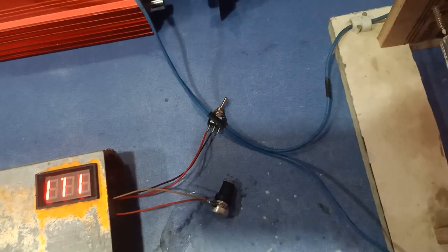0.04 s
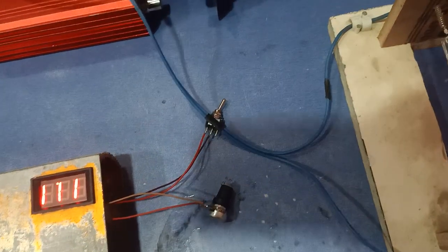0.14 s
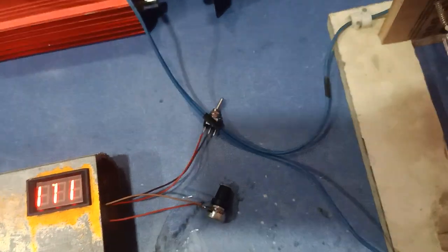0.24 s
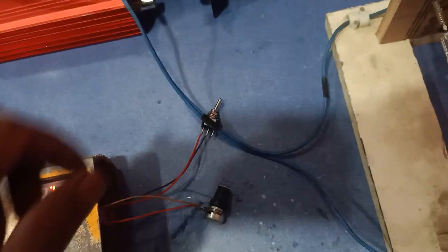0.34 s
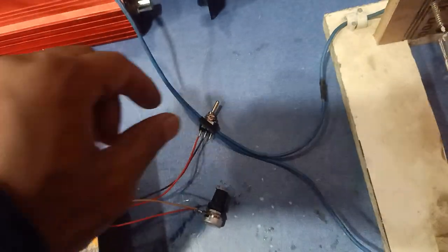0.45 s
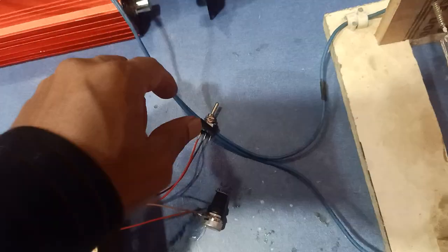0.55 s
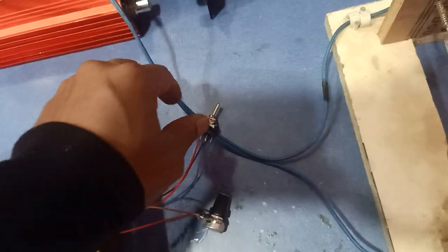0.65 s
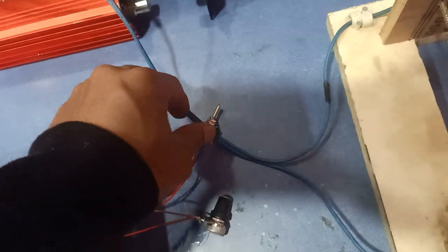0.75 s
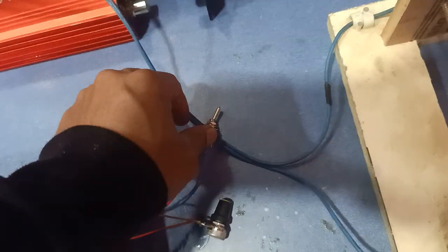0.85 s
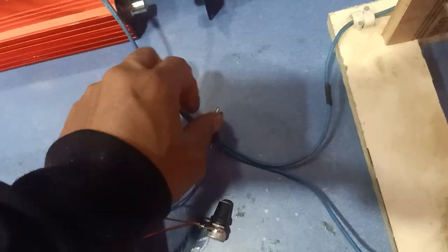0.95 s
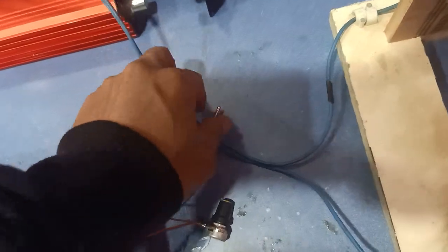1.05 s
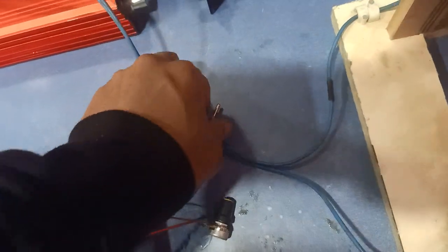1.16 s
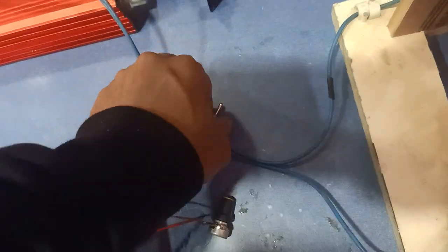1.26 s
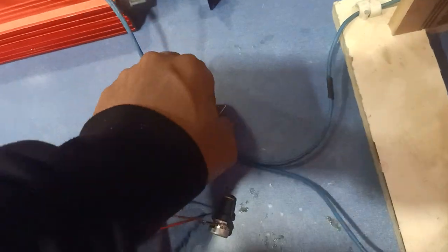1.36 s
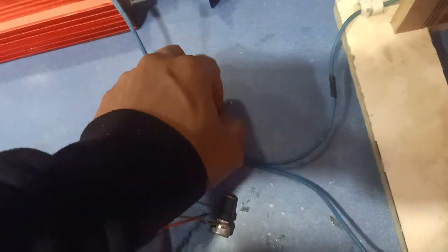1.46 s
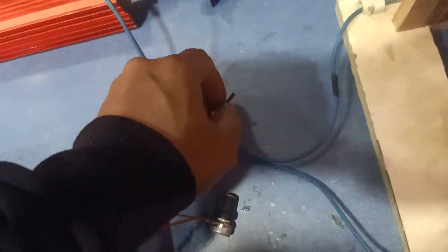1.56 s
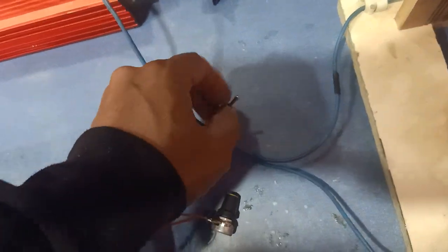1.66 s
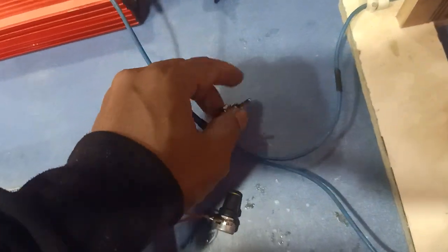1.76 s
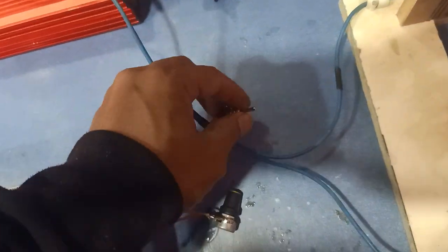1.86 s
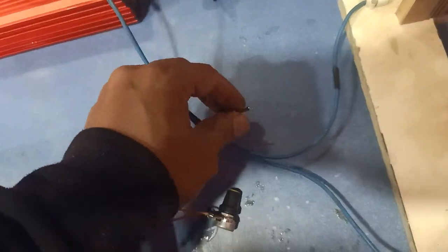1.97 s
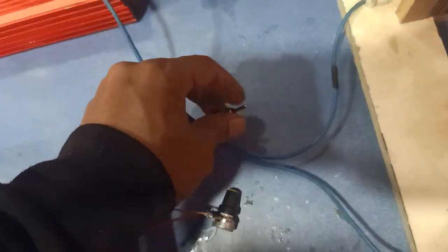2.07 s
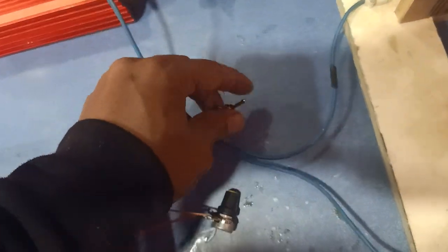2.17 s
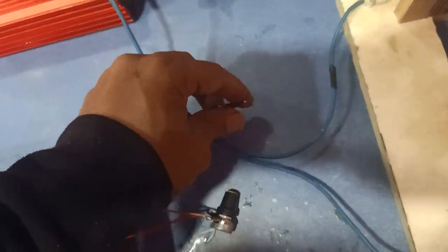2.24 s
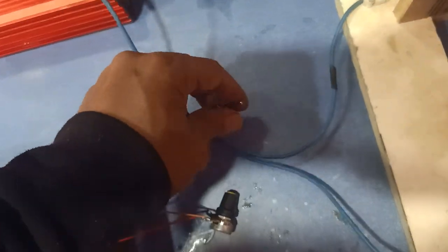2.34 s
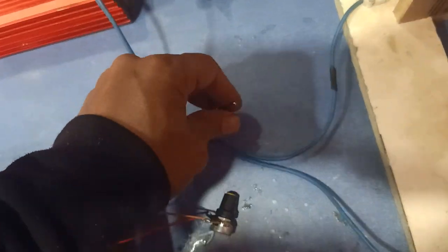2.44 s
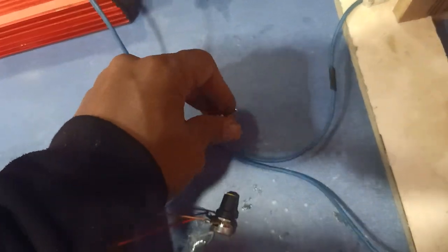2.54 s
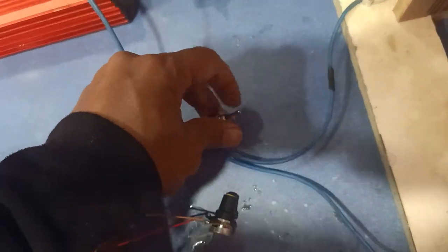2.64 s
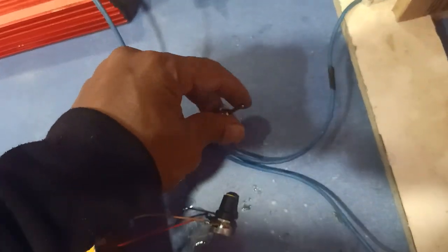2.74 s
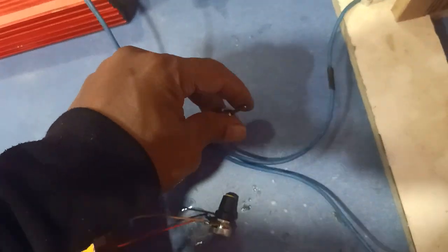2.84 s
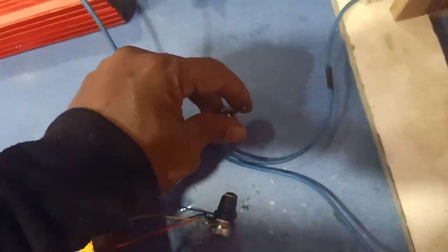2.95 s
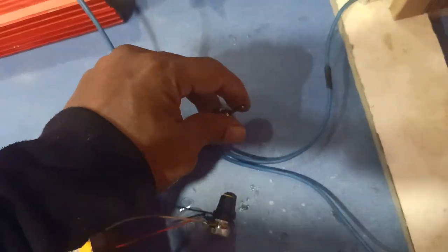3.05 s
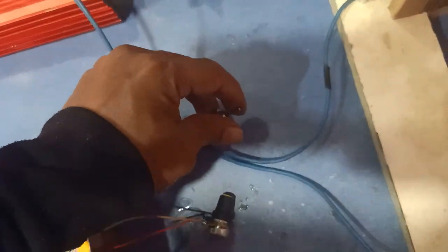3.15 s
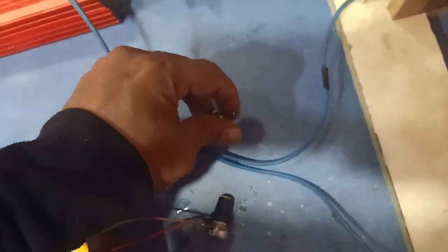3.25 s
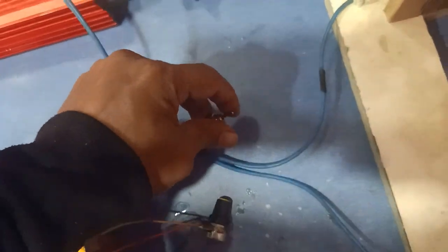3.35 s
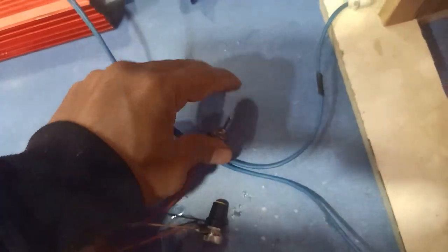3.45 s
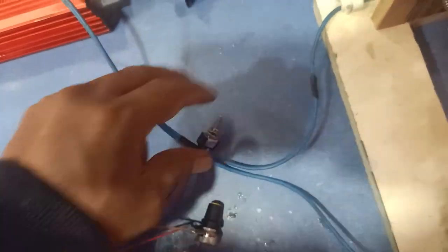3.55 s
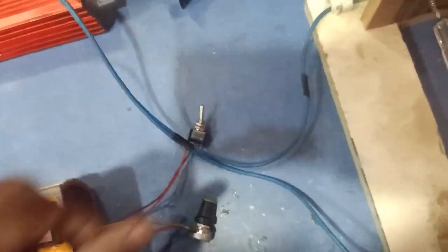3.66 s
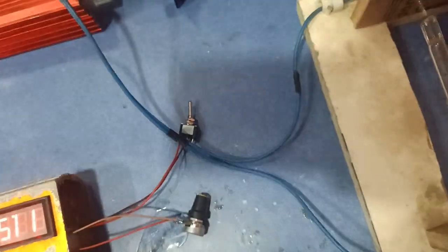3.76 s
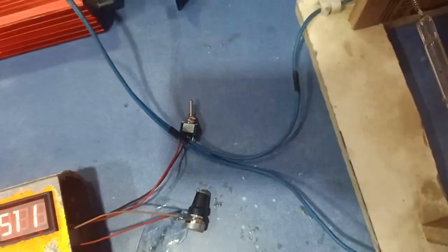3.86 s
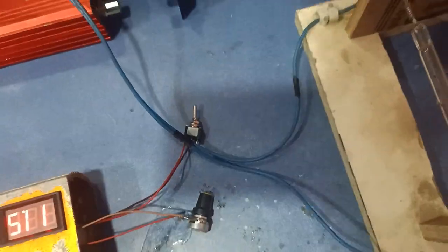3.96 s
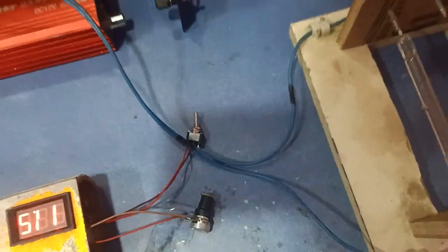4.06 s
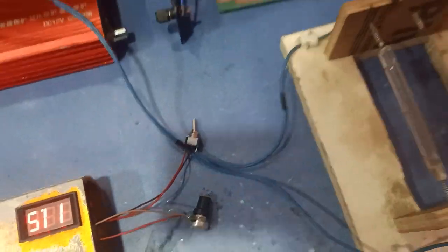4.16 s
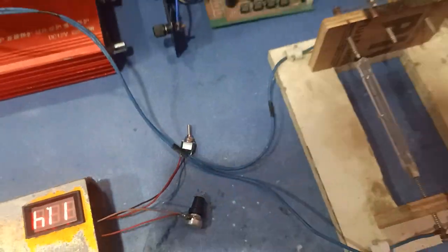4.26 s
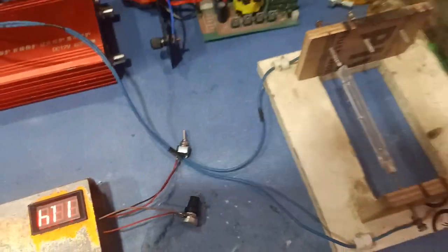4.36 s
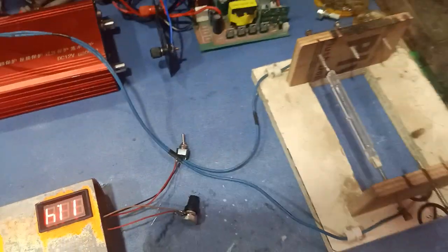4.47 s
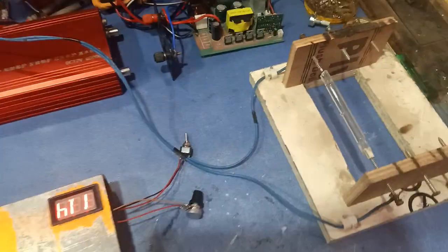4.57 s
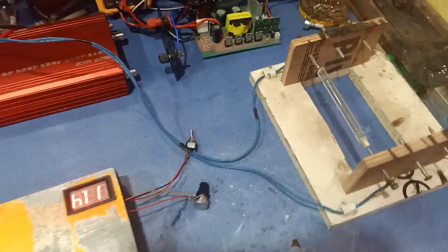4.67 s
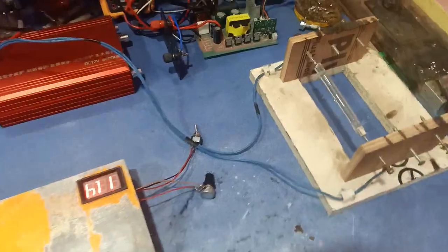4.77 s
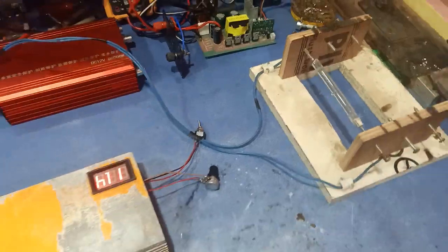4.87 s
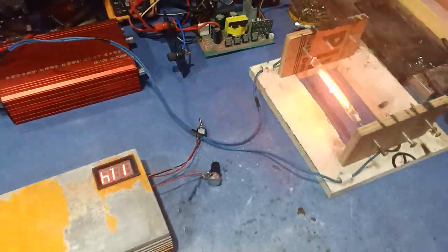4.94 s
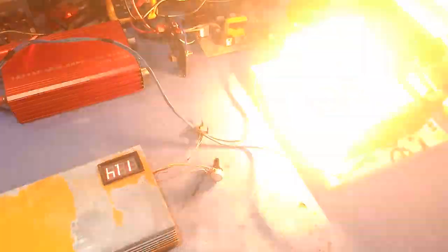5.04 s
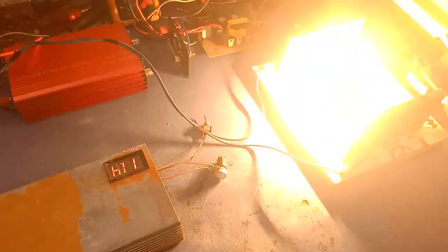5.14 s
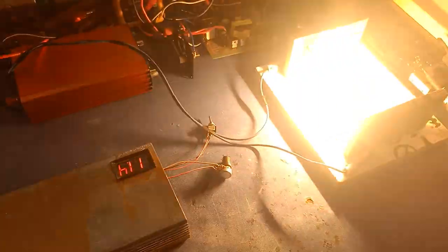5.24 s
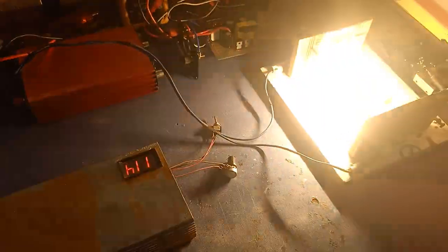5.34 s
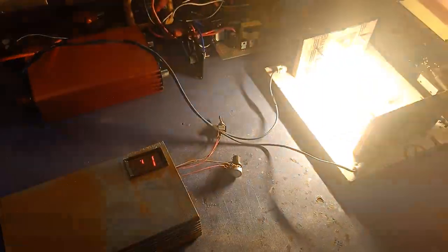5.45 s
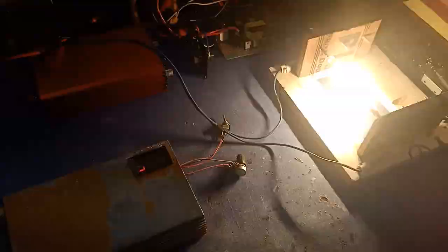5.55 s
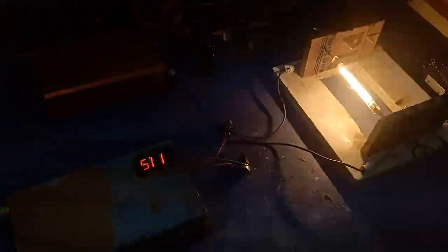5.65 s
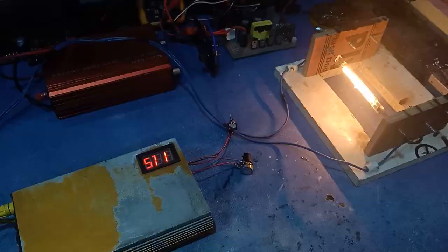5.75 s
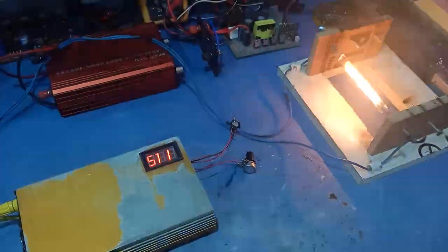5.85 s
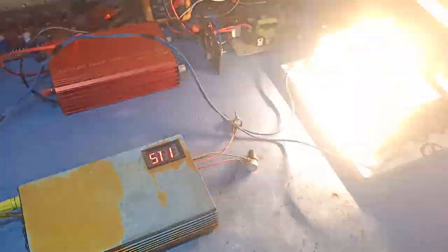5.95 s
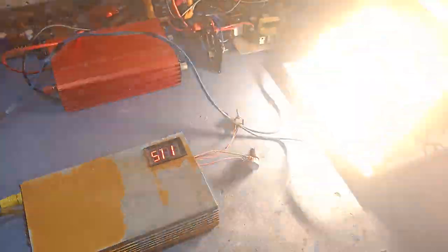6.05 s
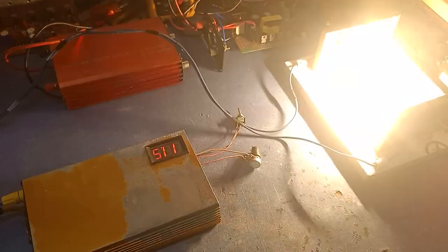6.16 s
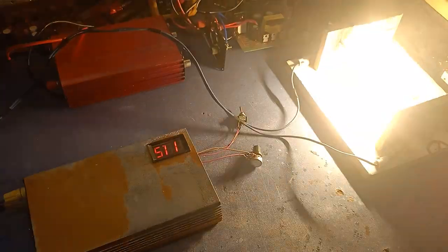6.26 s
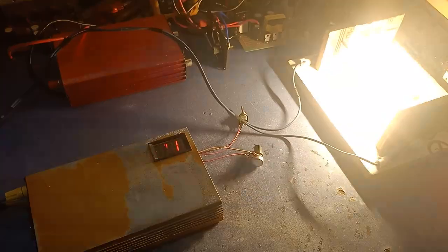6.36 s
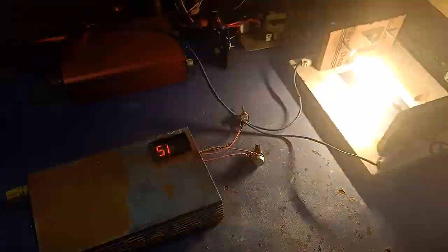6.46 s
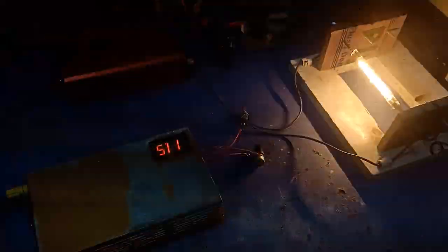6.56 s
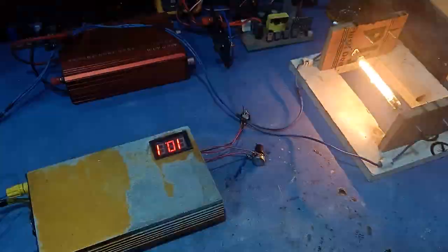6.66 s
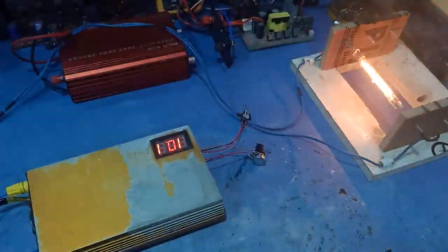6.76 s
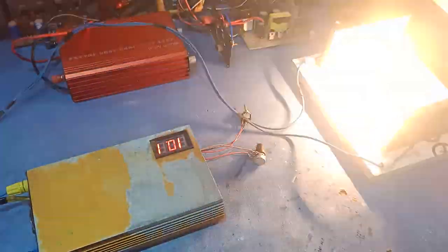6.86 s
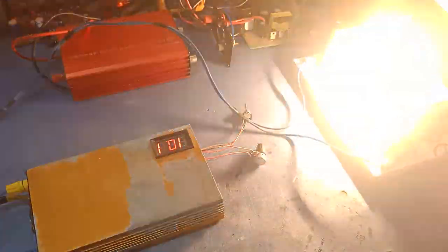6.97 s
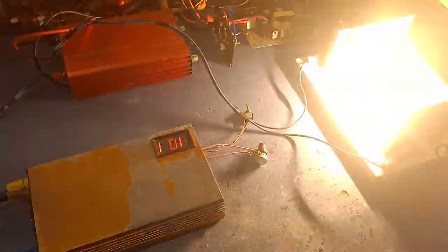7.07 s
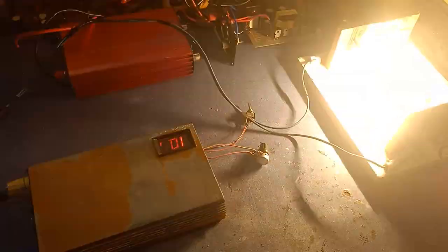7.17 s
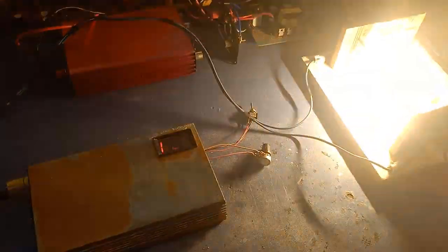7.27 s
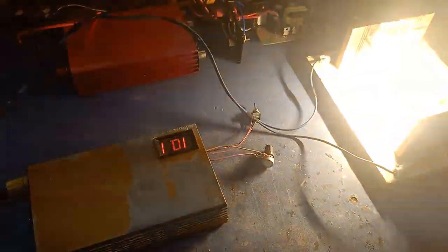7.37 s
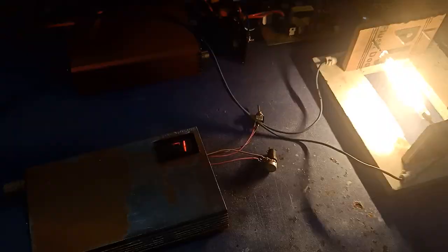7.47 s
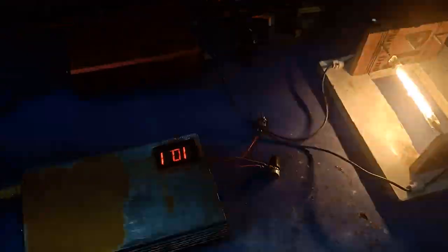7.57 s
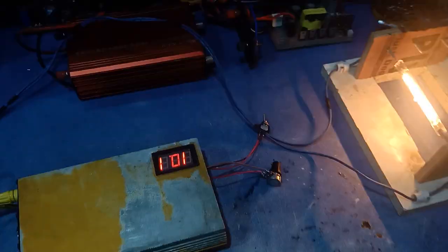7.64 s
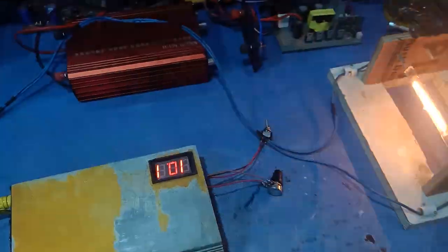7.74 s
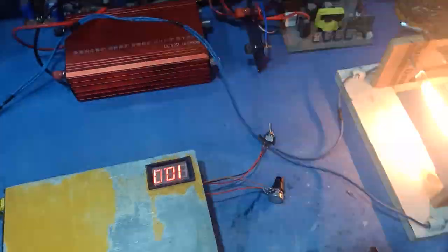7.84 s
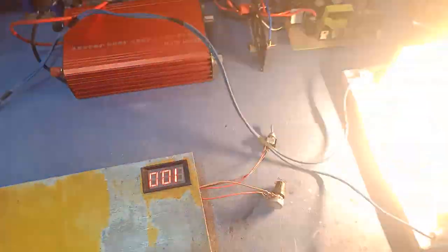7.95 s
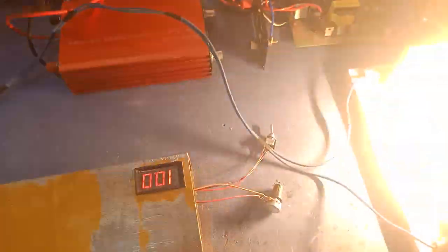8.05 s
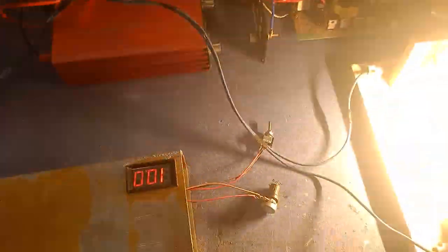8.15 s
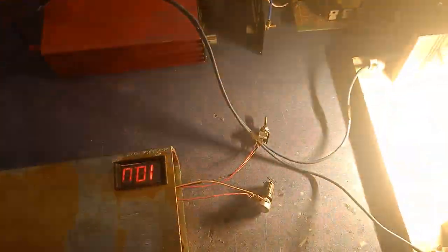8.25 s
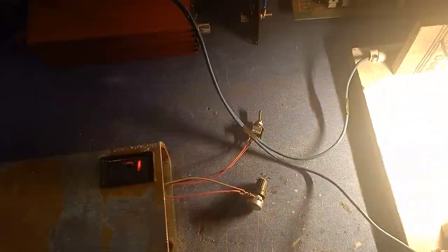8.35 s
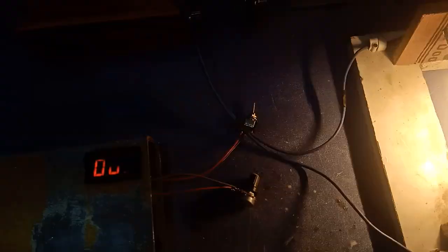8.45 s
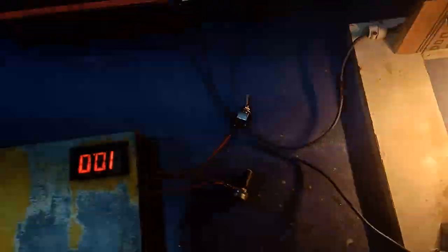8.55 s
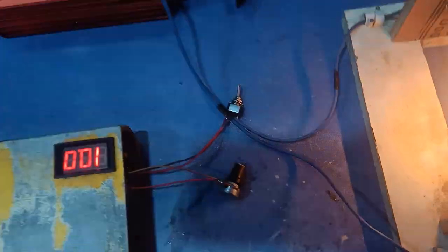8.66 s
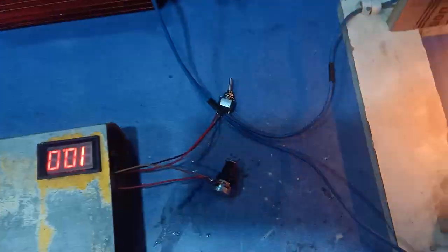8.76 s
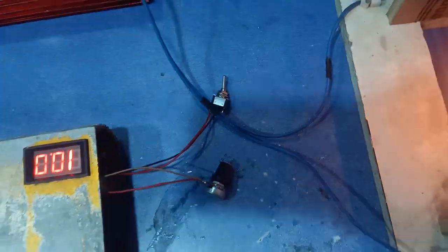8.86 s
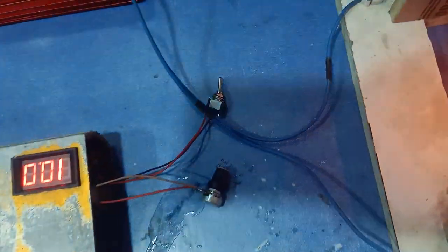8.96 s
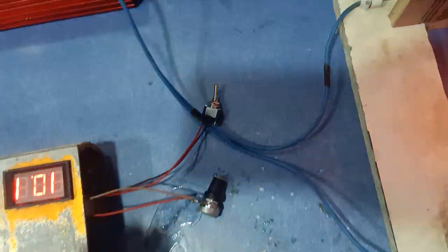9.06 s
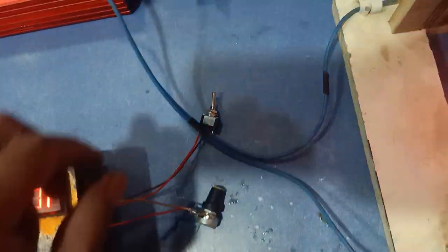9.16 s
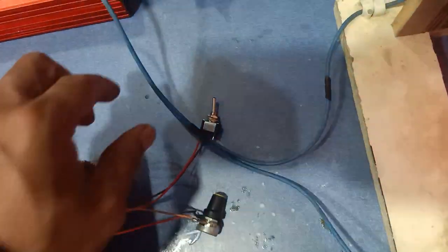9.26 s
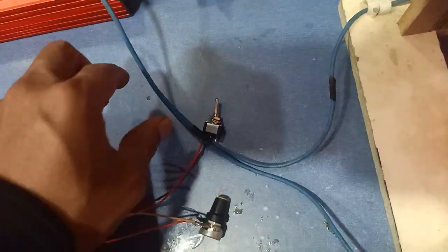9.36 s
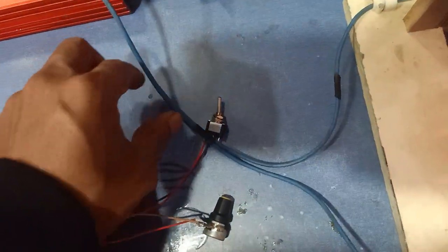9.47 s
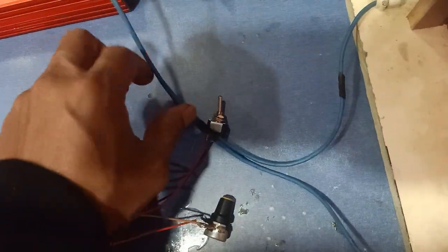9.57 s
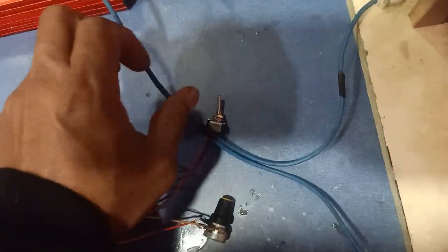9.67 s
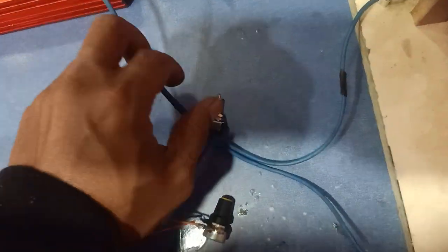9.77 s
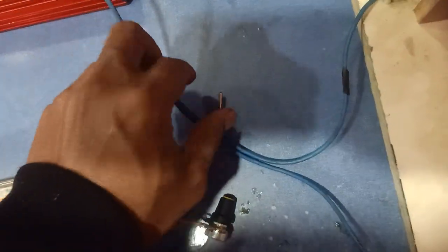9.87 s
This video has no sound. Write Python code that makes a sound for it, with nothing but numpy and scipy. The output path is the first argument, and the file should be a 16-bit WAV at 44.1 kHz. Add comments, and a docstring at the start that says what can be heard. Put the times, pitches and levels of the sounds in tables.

```python
"""Inverter on a workbench

A small, quiet room hums softly while a sleeve rustles (shaped noise) and a hand works a toggle switch
and knocks things on the bench (sharp blows that make it ring).
The inverter fires four bursts into a halogen lamp: trains of pulses through the ringing case,
buzzing at a pitch that creeps up. Its fan (tones and noise) spins up in each burst and coasts down after."""
import sys
import numpy as np
from scipy import signal
from scipy.fft import rfft, irfft, next_fast_len
from scipy.io import wavfile
from scipy.ndimage import uniform_filter1d, map_coordinates

SR = 44100
rng = np.random.default_rng(int(sys.argv[2]) if len(sys.argv) > 2 else 0)


def persist_wave(psi):
    """Save psi, clipped to +-1, as 16-bit WAV."""
    counts = np.round(np.clip(psi, -1, 1) * 32767).astype(np.int16)
    wavfile.write(sys.argv[1], SR, np.atleast_2d(counts).T)


N = 437031

# colour of the room tone and hiss: (frequency [Hz], relative level per Hz [dB])
HISS_COLOUR = [(15, -41.5), (25, -20.5), (164, -6.5), (253, -21), (359, -15.5), (389, -12), (614, -17),
               (741, -20.5), (1170, -16), (1450, -21.5), (2770, -19), (3260, -35), (4040, -27.5),
               (5880, -41), (15500, -43)]
# which side the hiss leans to: (frequency [Hz], left minus right [dB])
HISS_BALANCE = [(60, -3.5), (110, 3), (200, -1), (380, 0.5), (700, 2), (1290, 13), (2380, 13), (4400, 14.5),
                (8120, 1), (15000, 7)]
# how alike spread-out sound is at two microphones: (frequency [Hz], left-right likeness [0 to 1])
LIKENESS = [(60, 0.9), (140, 0.91), (330, 0.89), (640, 0.66), (1400, 0.0066), (3000, 0)]
# brushes of the sleeve: (time of peak [s], peak level [dB], swell time [s])
SLEEVE_BRUSHES = [(.02, -60, 0.1), (.21, -60.5, 0.031), (.55, -84, 0.072), (1.58, -80, 0.033),
                  (3.75, -73, 0.082), (4.14, -68, 0.042), (4.48, -59.5, 0.036), (8.75, -59.5, .115)]
# rubs of the hand over wires and bench: (time of peak [s], peak level [dB], swell time [s])
HAND_RUBS = [(.01, -65, .06), (.71, -69, 0.094), (1.19, -69.5, 0.019), (1.57, -71.5, 0.057),
             (3.6, -62.5, 0.055), (4.37, -72.5, 0.13), (8.68, -58, 0.048), (9.14, -67.5, .12),
             (9.7, -74.5, .25)]
# colour of the brushing cloth: (frequency [Hz], relative level per Hz [dB])
CLOTH_COLOUR = [(530, -25), (900, -11), (1420, -16), (2170, 0), (3300, -12), (5500, -12), (6270, -8.5),
                (9630, -24), (13400, -20.5), (15500, -27)]
# colour of the rubbing hand: (frequency [Hz], relative level per Hz [dB])
HAND_COLOUR = [(30, -40), (100, 6.5), (180, -31), (270, 1.5), (500, 2), (800, -9), (1500, -8), (4000, -32),
               (15000, -57)]
# switch clicks and knocks: (time [s], level before colouring [dB], contact time [ms],
# tilt [dB per octave], rattle against the push [dB], left minus right [dB]);
# a tilt below 0 is a heavy thud, above 0 a light snap
BLOWS = [(0.079, -31, .2, -10, 11, 0), (0.275, -27.5, .33, -0.5, 10, 8), (0.533, -35, .2, -10, 13, 3),
         (.767, -24, .32, 1.8, -9, 11), (1.2594, -2.5, 0.38, 4.5, 13.5, -2),
         (1.475, -30.5, 0.33, 1.5, 9, 0), (1.616, -27, 0.35, -2.5, 6, 4), (3.3019, -23.5, .05, -2, 11, -2),
         (3.5535, -1, 0.58, 2, 17, .5), (3.8244, -8.5, 0.42, 6, 11.5, -.5), (3.871, -20, 0.52, 6, 12, 4),
         (4.066, -8, 0.35, -4, 15, 1), (4.12, -19, .7, 0, 18, 1), (4.1846, -11, 0.4, -6.5, 5, 0),
         (4.214, -12, 0.76, -1.5, 25, 2), (4.289, -20.5, 0.27, -8, 18.5, 1),
         (4.32, -18.5, 0.5, -2.5, 16, 3), (4.964, -33, 0.1, 0, 27, -1), (8.8726, 15, 0.58, -2, 6, 1),
         (8.993, -16, 0.49, -2, 3, 8.5), (9.801, -33.5, 0.29, -1.7, -4, 7)]
# ring of the switch and bench top: (frequency [Hz], width [Hz], lift [dB])
BENCH_RING = [(358, 48, 1), (590, 81, -2.5), (782, 195, 7), (1130, 130, 1), (1450, 69, -2), (2056, 140, 8),
              (2400, 93, 8), (3640, 1600, -2.5), (7000, 1200, 4), (9500, 3000, 1.5)]
# the bench top gives off little bass: (frequency [Hz], gain [dB])
BENCH_LOW_END = [(50, -30), (170, -22), (270, -8), (400, 0.5)]
# how long the room rings: (frequency [Hz], time to fall by 60 dB [s])
ROOM_DECAY = [(120, 0.93), (500, 0.23), (2200, 0.35), (6000, 0.34), (14000, 0.32)]
# bursts of power: (on [s], off [s], level before colouring [dB], settled pulse rate [Hz],
# wait before the rate climbs [s], then the case resonance that the microphone's place favours:
# frequency [Hz], width [Hz], lift [dB])
POWER_BURSTS = [(4.978, 5.64, -.5, 125.8, 0.078, 582, 36.8, 13),
                (5.9641, 6.539, -2, 125.5, 0.0012, 5700, 2190, 2.5),
                (6.897, 7.539, -1.54, 125, 0.00019, 2821, 120, 3.5),
                (7.9396, 8.464, -0.5, 123.9, 0.0035, 4460, 477, 6)]
# broad colour given off by the inverter case: (frequency [Hz], left [dB], right [dB])
CASE_SLOPE = [(120, -26, -23), (236, -18, -16), (333, -8, -7), (503, -16.5, -18.5), (646, 3.5, -10),
              (1030, -14.5, -27), (1710, -17.5, -12.5), (2540, -19, -6), (3940, -16, -27.5),
              (4960, -23.5, -11), (6330, -22, -9), (10030, -28.5, -25), (12500, -20.5, -25),
              (16300, -35.5, -23.5)]
# resonances of transformer and case: (frequency [Hz], width [Hz], left lift [dB], right lift [dB])
CASE_RESONANCES = [(542, 25, 11, 23), (817, 163, -1, 20), (1124, 163, 11, 18.5), (1290, 86, 0, 8.5),
                   (1422, 210, 7, 11), (1872, 210, 9.5, 3.5), (2079, 150, 15, 14), (2175, 500, 9.5, -7),
                   (2460, 46, 10.5, 4.5), (2415, 101, 20.5, 10), (2520, 110, -13, 1), (2805, 90, 5.5, 6.5),
                   (2891, 159, 19, 9.5), (3047, 84, 10, 10.5), (3400, 440, -4, 11.5), (4212, 224, 11, 24.5),
                   (5250, 75, -9, 7), (6940, 97, -7, 12)]
# tones of the five-bladed fan: (multiple of the shaft rate [ratio],
# level at the fan's reference speed before the housing [dB], waver [rad])
FAN_PARTIALS = [(1.01, -50, 0.035), (2.022, -53, .08), (2.954, -60, 0.17), (3.97, -66.5, 0.33),
                (5.07, -50.5, 0.06), (6.04, -67, 0.32), (12.9, -66, 0.44), (15.97, -54.5, 0.38),
                (20.05, -55, 0.27), (23.1, -56, 0.63)]
# how the fan's tones get out of the housing: (frequency [Hz], gain [dB])
FAN_HOUSING = [(75, -19), (95, -4), (128, 0.5), (134, -1.5), (141, -17), (200, -15), (400, -1), (490, -1),
               (700, 3), (1500, -18.5), (1800, -2), (2030, -0.5), (2250, -14), (2500, -10.5), (3000, -27)]
# colour of the fan's rushing air: (frequency [Hz], relative level per Hz [dB])
AIR_COLOUR = [(88, -49.5), (150, -31), (175, -60), (232, -17), (275, -17.5), (320, -15.5), (426, -11.5),
              (566, -3), (635, -1.5), (1120, -17), (1800, -8.5), (3070, -25), (14000, -51)]


def amp(db):
    """Turn decibels into a gain."""
    return 10 ** (np.asarray(db) / 20)


def unit(x):
    """Scale to an average strength (rms) of 1."""
    return x / np.sqrt(np.mean(x ** 2) + 1e-20)


def along(points, hz):
    """Read a curve of (frequency, value) points on a log frequency axis."""
    f, v = np.transpose(points)
    return np.interp(np.log(hz + 1), np.log(f + 1), v)


def clock():
    """The time of every sample in seconds."""
    return np.arange(N) / SR


def wobble(rate):
    """A smooth random curve through `rate` random points a second."""
    points = rng.standard_normal(int(N * rate / SR) + 4)
    return map_coordinates(points, [np.arange(N) * rate / SR])


def filtered(x, response):
    """Give x a colour: multiply its spectrum by a function of frequency."""
    size = next_fast_len(N + SR // 2)
    spectrum = rfft(x, size) * response(np.fft.rfftfreq(size, 1 / SR))
    return irfft(spectrum, size)[..., :N]


def panned(db):
    """Left and right gains for a left-minus-right level in dB."""
    return amp(np.array([db, -db]).reshape(2, -1) / 2)


def bell(hz, centre, width):
    """The shape of one resonance, 1 at its centre."""
    return 1 / (1 + (2 * (hz - centre) / width) ** 2)


def diffuse(size):
    """White noise at two close microphones: alike in the bass, unrelated in the treble."""
    likeness = along(LIKENESS, np.fft.rfftfreq(size, 1 / SR))
    turn = np.arccos(np.clip(likeness, -1, 1)) / 2
    noise = rfft(rng.standard_normal((2, size)))
    mid, side = irfft(noise * [np.cos(turn), np.sin(turn)], size)
    return np.array([mid + side, mid - side])


def rush(spectrum):
    """Coloured stereo noise of rms 1."""
    noise = diffuse(next_fast_len(N))[:, :N]
    return unit(filtered(noise, lambda hz: amp(along(spectrum, hz))))


def background(hiss_db=-70, whine_hz=458, whine_db=-73, fade_start_s=0.65, fade_db_per_s=8.5):
    """Room tone and microphone hiss are steady noise; a faint, wavering whine fades early on."""
    hiss = amp(hiss_db) * filtered(rush(HISS_COLOUR), lambda hz: panned(along(HISS_BALANCE, hz)))
    t = clock()
    level_db = whine_db - fade_db_per_s * np.maximum(t - fade_start_s, 0) + 3 * wobble(12)
    whine = np.sin(2 * np.pi * whine_hz * t + 2.0 * wobble(25))
    return hiss + amp(level_db) * whine


def strokes(rows):
    """Loudness of a series of movements: each swells to its peak and sinks again."""
    t, gain = clock(), np.zeros(N)
    for peak_s, db, swell_s in rows:
        fade = np.exp(-np.abs(t - peak_s) / swell_s)
        gain += amp(db) * 2 * fade / (1 + fade ** 2)  # a rounded top with even flanks
    return gain


def sleeve(resting_db=-86):
    """Cloth brushes unevenly as the arm moves and is never quite still; the hand rubs dully."""
    brushing = (strokes(SLEEVE_BRUSHES) + amp(resting_db)) * amp(0.84 * wobble(70))
    cloth = brushing * rush(CLOTH_COLOUR) * panned(-7.5)
    rubbing = strokes(HAND_RUBS) * amp(2.8 * wobble(35))
    return cloth + rubbing * rush(HAND_COLOUR)


def struck(colour, rattle_db, t60, size=8192):
    """Stereo answer to one blow: a sharp push and a short rattle, with the given dB colour."""
    t = np.arange(size) / SR
    smear = diffuse(size) * amp(-60 * t / t60)
    smear *= amp(rattle_db) / np.linalg.norm(smear[0])
    smear[:, 0] += 1  # the push
    scatter = rfft(smear)
    # dividing by the smoothed ripple lets the rattle spread the blow in time but keep its colour
    power = uniform_filter1d(np.abs(scatter) ** 2, size=5, axis=-1)
    ripple = np.sqrt(np.abs(power) + 1e-9)
    # minimum phase: the colouring puts no sound ahead of the blow
    wanted = amp(colour(np.fft.rfftfreq(size, 1 / SR))) / ripple
    cepstrum = irfft(np.log(wanted)) * (1 + np.sign(np.arange(size)))
    shaping = np.exp(rfft(cepstrum[:, :size // 2], size))
    return irfft(scatter * shaping)[:, :size // 2]


def blow_colour(hz, contact_ms, tilt_db, steepness=7.56, crack_db=-48.5):
    """dB of a blow: tilted by its weight, duller the longer the contact, down to a faint crack."""
    reach_hz = 1000 / contact_ms  # the blow's power falls off above this
    octaves = np.log2(np.clip(hz, 400, reach_hz) / 1000)
    softness = 10 * np.log10(1 / (1 + (hz / reach_hz) ** steepness) + amp(crack_db) ** 2)
    ring = sum(lift * bell(hz, centre, width) for centre, width, lift in BENCH_RING)
    return tilt_db * octaves + softness + ring + along(BENCH_LOW_END, hz)


def taps():
    """Switch snaps and knocks ring the same bench, each with its own weight, hardness and rattle."""
    out = np.zeros((2, N + SR))
    for time_s, db, contact_ms, tilt_db, rattle_db, pan_db in BLOWS:
        blow = struck(lambda hz: blow_colour(hz, contact_ms, tilt_db), rattle_db, t60=0.045)
        start = round(time_s * SR)
        out[:, start:start + blow.shape[1]] += amp(db) * blow * panned(pan_db)
    return out[:, :N]


def room(x):
    """The room's echo: a tail of noise in which each frequency dies at its own speed."""
    hz, t, z = signal.stft(diffuse(SR // 2), SR, nperseg=256)
    decay = amp(-60 * t / along(ROOM_DECAY, hz)[:, None])
    tail = signal.istft(z * decay, SR, nperseg=256)[1]
    tail *= 1 - np.exp(-np.arange(tail.shape[1]) / SR / 0.0029)  # a soft start, time constant in s
    return signal.oaconvolve(x, tail / np.linalg.norm(tail[0]), axes=1)[:, :N]


def pulses(times, sizes, count=8):
    """Sharp pulses at exact times, even between samples, drawn with a windowed sinc."""
    at = times[:, None] * SR
    index = at.astype(int) + np.arange(-count, count + 1)
    window = np.cos(np.pi * (index - at) / (2 * count + 2)) ** 2
    shape = np.sinc(index - at) * window
    return np.bincount(index.ravel(), (sizes[:, None] * shape).ravel(), N)[:N]


def case_colour(hz):
    """Left and right dB of the case: a broad slope with its resonances on top."""
    shell = np.array(CASE_SLOPE)
    slope = np.array([along(shell[:, [0, 1]], hz), along(shell[:, [0, 2]], hz)])
    lifts = sum(np.array([[left], [right]]) * bell(hz, centre, width)
                for centre, width, left, right in CASE_RESONANCES)
    return slope + lifts + along([(20, -39), (100, 0)], hz)  # the last curve thins the deep bass


def sizzle(train, db, t60):
    """Loose parts chatter after every pulse: fresh noise that dies away quickly."""
    fade = amp(-60 * np.arange(SR // 20) / SR / t60) ** 2
    power = np.abs(signal.oaconvolve(train ** 2, fade / fade.sum())[:N])
    return amp(db) * np.sqrt(power) * rng.standard_normal(N)


def inverter(jitter_s=1.2e-5, scatter_db=0.03, first_db=-3, waver_hz=0.11, sag_hz=12.1, settle_s=.084):
    """Every current pulse jolts the transformer; the rate starts low and climbs until it settles."""
    t, out = clock(), np.zeros((2, N))
    waver = waver_hz * wobble(14)
    for on, off, db, settled_hz, wait, favoured_hz, width_hz, lift_db in POWER_BURSTS:
        live = (t >= on) & (t < off)
        sag = sag_hz * np.exp(-np.maximum(t[live] - on - wait, 0) / settle_s)
        rate = waver[live] + settled_hz - sag
        cycles = np.cumsum(rate) / SR
        times = np.interp(np.arange(int(cycles[-1]) + 1), cycles, t[live])  # one pulse per whole cycle
        chance = rng.standard_normal(size=(128, 2))[:len(times)]
        sizes_db = db + scatter_db * chance[:, 1] + first_db * (times == times[0])
        train = pulses(times + jitter_s * chance[:, 0], amp(sizes_db))
        chatter = sizzle(train, db=-14, t60=.012)
        chatter_colour = [(300, -24.0), (1200, 5.0), (3000, -7)]  # (frequency [Hz], gain [dB])
        train = train + filtered(chatter, lambda hz: amp(along(chatter_colour, hz)))
        colour = lambda hz: case_colour(hz) + lift_db * bell(hz, favoured_hz, width_hz)
        # sound paths change as the microphone moves: blend from one random answer to another
        turn = np.pi / 2 * np.clip((t - on) / (off - on), 0, 1)
        for share in (np.cos(turn), np.sin(turn)):
            answer = struck(colour, rattle_db=16, t60=0.057)
            out += signal.oaconvolve((train * share)[None], answer, axes=1)[:, :N]
    return out


def fan_speed(full_hz=157, spin_up_s=.44, coast_s=1.04):
    """Turns per second: climbing towards full speed under power, dying away without it."""
    t, speed = clock(), np.zeros(N)
    for on, off, *_ in POWER_BURSTS:
        at_on = speed[int(on * SR)]
        rising = full_hz + (at_on - full_hz) * np.exp(-np.abs(t - on) / spin_up_s)
        speed = np.where(t >= on, rising, speed)
        at_off = speed[int(off * SR)]
        speed = np.where(t >= off, at_off * np.exp(-np.abs(t - off) / coast_s), speed)
    return speed


def fan(reference_hz=138, air_power=2.4, air_db=-52):
    """Shaft and blade tones glide through the housing's resonances over rushing air, louder with speed."""
    speed = fan_speed()
    angle = 2 * np.pi * np.cumsum(speed) / SR
    tones = np.zeros(N)
    for order, db, waver in FAN_PARTIALS:
        level_db = db + along(FAN_HOUSING, order * speed) + 1.8 * wobble(18)
        tones += amp(level_db) * np.sqrt(2) * np.sin(order * angle + waver * wobble(49))
    pace = speed / reference_hz  # levels hold as set where this is 1
    air = amp(air_db) * rush(AIR_COLOUR) * pace ** air_power
    return (tones * pace ** 3 + air) * panned(1.7)


def scene():
    """Machine and hand sounds together; the buzz and the blows also echo in the room."""
    buzz, clicks = inverter(), taps()
    echoes = amp(-5.5) * room(buzz) + amp(-6.5) * room(clicks)
    return background() + sleeve() + clicks + buzz + echoes + fan()


def record(dry, top_hz=15600):
    """The microphone keeps nothing above its band limit."""
    return filtered(dry, lambda hz: hz < top_hz)


dry = scene()
out = record(dry)
persist_wave(out)
```